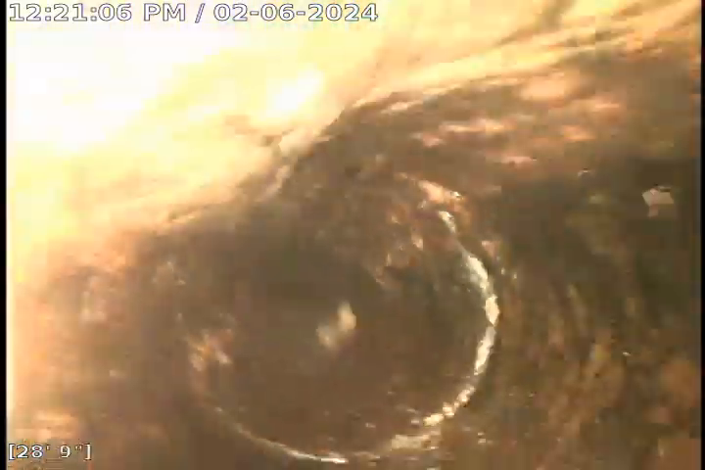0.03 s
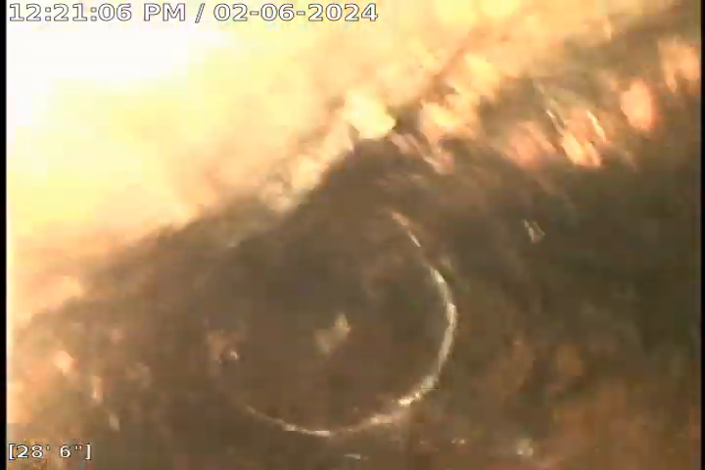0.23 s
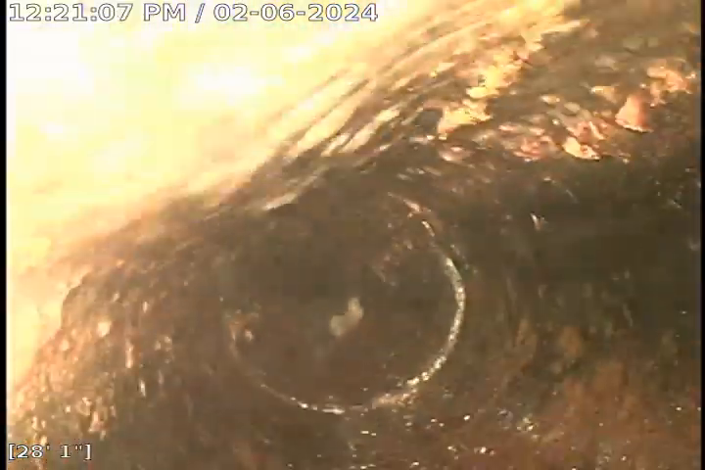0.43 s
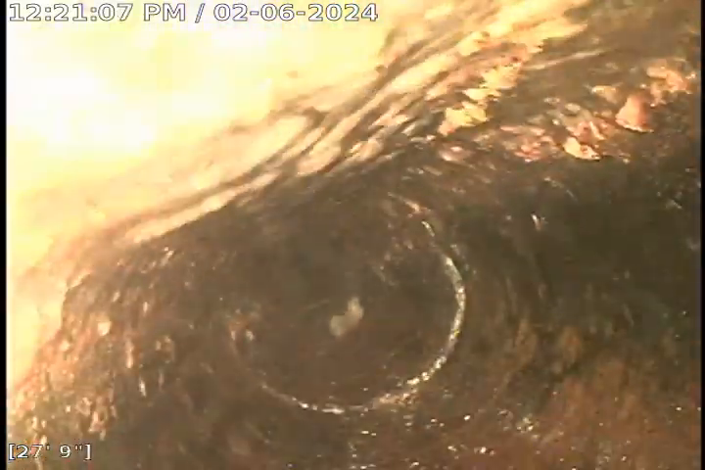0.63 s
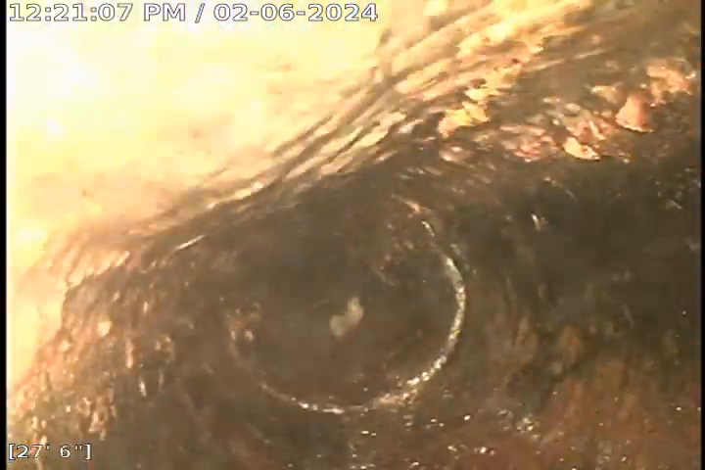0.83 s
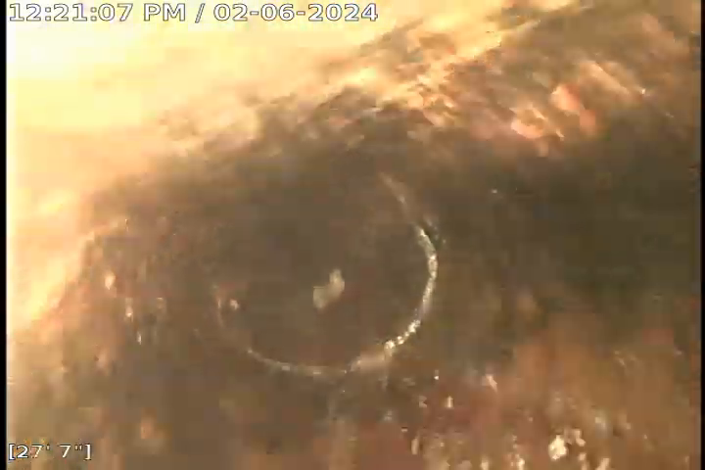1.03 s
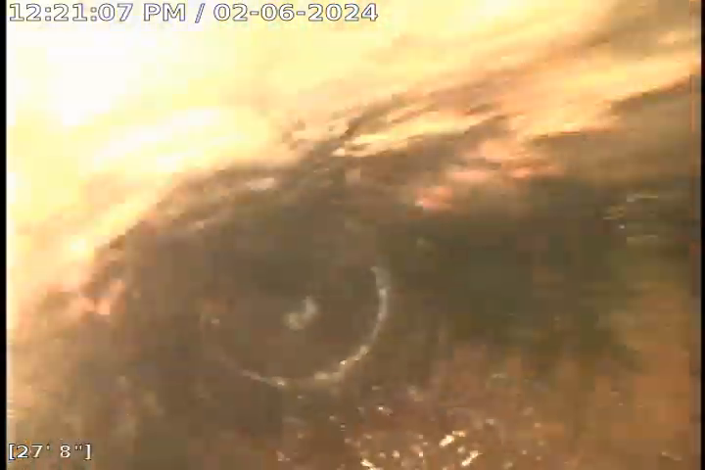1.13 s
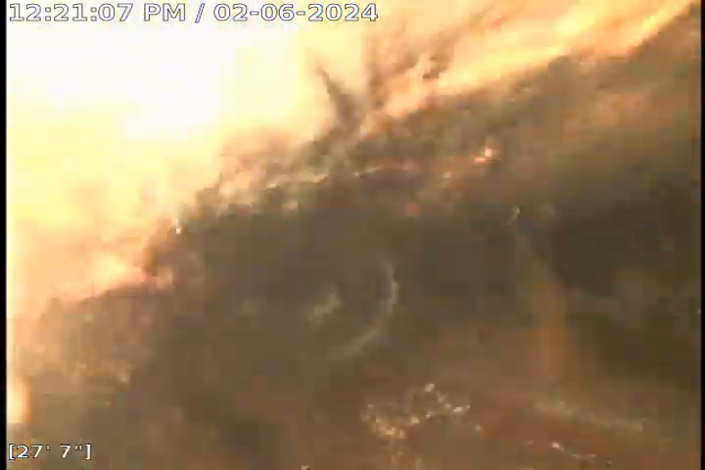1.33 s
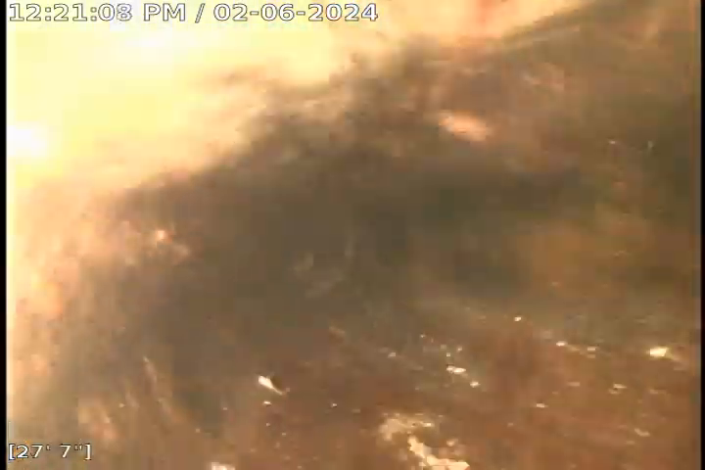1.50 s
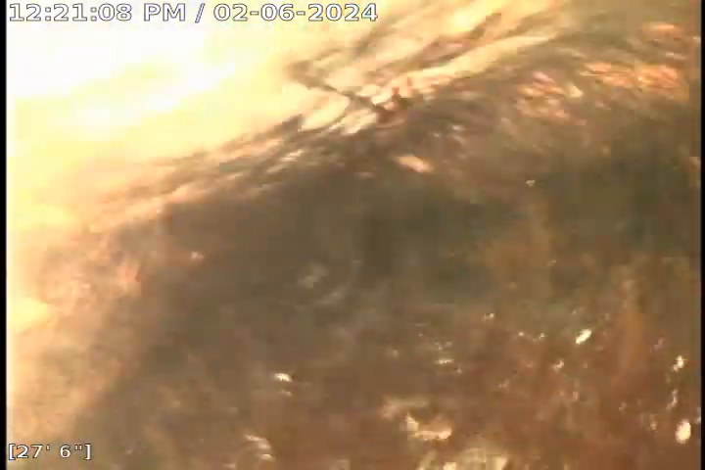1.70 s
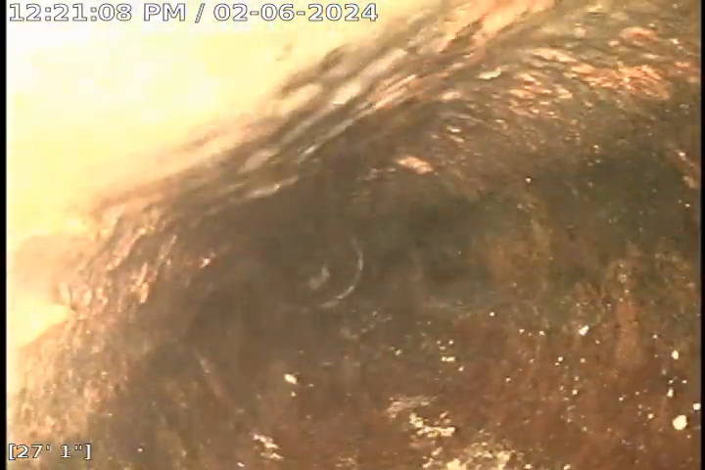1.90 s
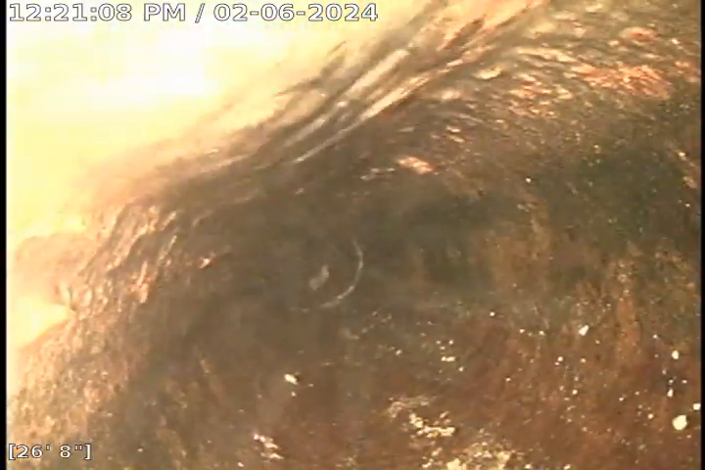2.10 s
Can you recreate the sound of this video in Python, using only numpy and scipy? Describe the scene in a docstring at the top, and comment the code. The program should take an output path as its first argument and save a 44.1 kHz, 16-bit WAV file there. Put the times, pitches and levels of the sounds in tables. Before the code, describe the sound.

A cable reel knocks loudly right at the start, a sharp crack with a short boom and rattle that overloads the microphone. Soft bumps follow until 0.8 seconds while the cable slides in faint, swelling strokes of hiss. Lighter clacks come at about 1.1 and 1.5 seconds, then more rubbing from 1.8 and a small dull knock at 2. The reel rumbles faintly throughout, in a small, hard room.

```python
"""A cable reel knocks as an inspection camera's cable is pulled from a drain and fed onto it.
One sharp knock overloads the microphone; lighter clacks and soft bumps follow. Each knock cracks
at the contact, rattles the struts and booms the frame near 250 Hz. Between knocks the cable slides
in short swelling strokes of hiss and keeps the frame rumbling faintly. The room is small and hard."""
import sys
import numpy as np
from scipy import signal
from scipy.fft import rfft, irfft, next_fast_len
from scipy.io import wavfile
from scipy.ndimage import map_coordinates

SR = 44100
rng = np.random.default_rng(int(sys.argv[2]) if len(sys.argv) > 2 else 0)


def generate_wav(sig):
    """Save sig (samples, or channels by samples) to the path in sys.argv[1] as 16-bit PCM at SR."""
    pcm = np.round(np.clip(np.atleast_2d(sig).T, -1, 1) * 32767).astype(np.int16)
    wavfile.write(sys.argv[1], SR, pcm)


N = 94859

# Cable knocks on the reel. Each row: start in seconds, boom gain in dB, boom tilt in dB per octave,
# clatter gain in dB, crack gain in dB, crack roll-off in Hz, room tail gain in dB.
KNOCKS = [(0.0145, 4, 1, -14, -5, 16400, -12.5), (1.057, -28, 29.5, -34.5, -40, 4940, -21),
          (1.124, -22, 15, -24.5, -26.5, 5200, -11), (1.4522, -23.5, -19, -24.5, -20, 14000, -15),
          (1.463, -30, 31.5, -37.5, -36, 9900, -6), (2.017, -27.5, 21, -35, -62, 6300, -15)]
# Soft bumps. Each row: start in seconds, boom gain in dB, boom tilt in dB per octave.
BUMPS = [(0.117, -25, 2), (0.298, -32.5, 6.5), (0.362, -30.5, 17), (.386, -29.5, 14), (0.521, -38.5, 19),
         (0.635, -31.5, 11.5), (0.725, -35, -11), (.771, -27, -11.5), (0.786, -24, 7), (1.068, -28.5, 18),
         (1.134, -24, -14), (1.221, -24.5, -7), (1.537, -26.5, 6), (2.041, -39, -27), (2.11, -37, -22)]
# Modes of frame, struts and contact. Each row: frequency in Hz, gain in dB, T60 in seconds.
FRAME_MODES = [(166.7, -10.5, 0.13), (249.1, -3, 0.12), (260.2, -1, 0.085), (273, -9.5, 0.15),
               (325, -16, 0.12), (347.3, -11.5, 0.09), (436.4, -23, 0.24)]
STRUT_MODES = [(440, 1, .08), (482, -1, .09), (655, 1, .11), (726, 3, .11), (775, -8, .15), (935, -2, .13),
               (1105, -3, .1), (1283, -7, .15), (1365, -8, .12)]
CONTACT_MODES = [(2930, 6, 0.025), (3110, 3, 0.025), (3430, 5, 0.032), (3610, -3, 0.035), (4160, -5, 0.03),
                 (4520, -6, 0.025)]
# Cable strokes. Each row: start and length in seconds, hiss and rasp gains in dB, top rasp pitch in Hz.
STROKES = [(0.222, 0.079, -55, -46.5, 4210), (0.298, 0.18, -46, -50.5, 3890),
           (0.432, 0.17, -46.5, -60, 3140), (0.64, .22, -49.5, -53.5, 4870), (0.78, 0.14, -48, -54, 4870),
           (0.972, 0.16, -55, -48, 2788), (1.084, 1, -57.5, -63, 3660), (1.428, 0.044, -58, -36, 3600),
           (1.797, 0.19, -44, -48, 3815), (1.946, 0.18, -45, -60, 3000)]
# Cable scuffs on the struts. Each row: start in seconds, length in seconds, gain in dB.
SCUFFS = [(1.035, 0.052, -40.5), (1.419, 0.027, -28), (1.475, 0.023, -37.5), (1.516, 0.032, -37.5),
          (1.967, 0.1, -47)]
# Reel rumble envelope. Each row: time in seconds, relative level in dB.
RUMBLE_ENVELOPE = [(0.0, -40), (0.19, -52), (0.48, -55), (0.69, -56), (0.93, -66.5), (1.08, -46),
                   (1.33, -56), (1.6, -49.5), (1.9, -53.5), (2.15, -54.5)]
# Noise spectra. Each row: frequency in Hz, relative density in dB.
CLATTER_SPECTRUM = [(100, -10), (170, -8), (350, 5), (470, 0), (570, -5.5), (720, 0), (1150, 1), (1480, -3),
                    (1800, -24), (9000, -42)]
CRACK_SPECTRUM = [(200, -4.5), (1400, -7), (2400, -4), (3150, -1.5), (4000, -4), (6500, -5), (9000, -12),
                  (15500, -20.5)]
HISS_SPECTRUM = [(300, -43), (1400, -11), (2500, 1), (5000, -1), (7000, -3.5), (10000, -8.5), (15500, -13)]
SCUFF_SPECTRUM = [(90, -37), (250, 16.5), (450, 6), (1100, 2.5), (1700, -4.5), (5000, -14), (15000, -37)]
RUMBLE_SPECTRUM = [(90, -10.5), (180, 0.5), (265, 2.5), (330, -13.5), (420, -1.5), (560, -31), (1000, -17),
                   (2000, -46.5)]
ROOM_NOISE_SPECTRUM = [(25, -18), (70, -3.5), (150, 1), (1000, -3), (1600, -7.5), (3500, -7.5), (6000, -11),
                       (9000, -19.5), (15500, -24)]
SELF_NOISE_SPECTRUM = [(25, 13), (280, -2.5), (6000, -19), (15500, -25)]
# Room decay. Each row: frequency in Hz, T60 in seconds.
ROOM_DECAY = [(150, 0.08), (500, 0.47), (1600, 0.39), (4000, 0.25), (8000, 0.24), (15000, 0.15)]
# Stereo width. Each row: frequency in Hz, side gain in dB.
STEREO_WIDTH = [(60, -7), (200, -40), (1000, -34), (3000, -27.5), (15000, -18)]
# Channel DC offsets. Each row: offset as a fraction of full scale.
DC_OFFSETS = [
    [.0188],
    [.0046],
]

BOOM_LAG_S, BOOM_RISE_S, TILT_PIVOT_HZ = 0.003685, 0.011, 260
CLATTER_RISE_S, CLATTER_T60_S, STRUT_DB, CLATTER_ROLLOFF_RATIO = 0.0011, 0.12, -5, 0.12
CRACK_RISE_S, CRACK_T60_S, RING_DB = 0.000077, 0.05, -6
SNAP_DB, SNAP_T60_S = -3.5, 0.004
SWELL_EXPONENT, RASP_SAG_RATIO, RASP_WIDTH_HZ = 0.81, 0.22, 1800
SCUFF_RAMP_S, GRAIN_DB = 0.026, 1.2
RUMBLE_GAIN_DB, RUMBLE_WOBBLE_DB = 7, 2.5
BOOM_ROOM_DB, CLATTER_ROOM_DB, ROOM_DELAY_S = -10, 4, 0.0033
ROOM_NOISE_DB, SELF_NOISE_DB = -48, -71
LOW_CUT_HZ, BAND_LIMIT_HZ = 127, 15800


def reel_knocks():
    """Knocks excite frame, struts and contact; soft bumps excite only the frame."""
    booms, impacts = np.zeros(N), np.zeros(N)
    for start_s, boom_db, tilt_db_oct, clatter_db, crack_db, rolloff_hz, room_db in KNOCKS:
        booms += amp(boom_db) * frame_boom(start_s + BOOM_LAG_S, tilt_db_oct)
        clatter = strut_clatter(start_s)
        crack = contact_crack(start_s)
        clatter += amp(room_db + CLATTER_ROOM_DB) * room_tail(noise(CLATTER_SPECTRUM), start_s)
        crack += amp(room_db) * room_tail(noise(CRACK_SPECTRUM), start_s)
        impacts += amp(clatter_db) * lowpass(clatter, CLATTER_ROLLOFF_RATIO * rolloff_hz)
        impacts += amp(crack_db) * lowpass(crack, rolloff_hz)
    for start_s, boom_db, tilt_db_oct in BUMPS:
        booms += amp(boom_db) * frame_boom(start_s, tilt_db_oct)
    return impacts + booms + amp(BOOM_ROOM_DB) * room_reverb(booms)


def frame_boom(start_s, tilt_db_oct):
    """Low frame modes, pushed in phase; each blow's tilt makes its boom deeper or higher."""
    t = since(start_s)
    boom = np.zeros(N)
    for hz, db, t60_s in FRAME_MODES:
        mode_db = db + tilt_db_oct * np.log2(hz / TILT_PIVOT_HZ) + rng.standard_normal()
        boom += amp(mode_db) * struck(t, BOOM_RISE_S, t60_s) * np.sin(2 * np.pi * hz * t)
    return boom


def strut_clatter(start_s):
    """Thin struts rattle and ring."""
    t = since(start_s)
    rattle = noise(CLATTER_SPECTRUM) * struck(t, CLATTER_RISE_S, CLATTER_T60_S)
    return rattle + amp(STRUT_DB) * ring(STRUT_MODES, t, CLATTER_RISE_S)


def contact_crack(start_s):
    """The contact point snaps, cracks and rings brightly."""
    t = since(start_s)
    snap = amp(SNAP_DB) * struck(t, CRACK_RISE_S, SNAP_T60_S)
    envelope = snap + struck(t, CRACK_RISE_S, CRACK_T60_S)
    return noise(CRACK_SPECTRUM) * envelope + amp(RING_DB) * ring(CONTACT_MODES, t, CRACK_RISE_S)


def cable_slide():
    """Stroke level and rasp pitch follow cable speed; duller scuffs rub the struts."""
    friction = np.zeros(N)
    for start_s, length_s, hiss_db, rasp_db, rasp_hz in STROKES:
        progress = np.clip(since(start_s) / length_s, 0, 1)
        speed = 1 - (2 * progress - 1) ** 2
        hiss = amp(hiss_db) * noise(HISS_SPECTRUM)
        rasp = amp(rasp_db) * cable_rasp(rasp_hz * (1 - RASP_SAG_RATIO * (1 - speed)))
        friction += speed ** SWELL_EXPONENT * (hiss + rasp)
    for start_s, length_s, db in SCUFFS:
        friction += amp(db) * held(start_s, length_s, SCUFF_RAMP_S) * noise(SCUFF_SPECTRUM)
    return friction * amp(GRAIN_DB * wobble(rate_hz=320))


def cable_rasp(centre_hz):
    """Narrow noise band with a moving centre."""
    white = rng.standard_normal((2, N))
    in_phase, quadrature = filtered(white, lambda hz: 1 / (1 + (2 * hz / RASP_WIDTH_HZ) ** 2))
    phase = 2 * np.pi * np.cumsum(centre_hz) / SR
    return unit_rms(in_phase * np.cos(phase) + quadrature * np.sin(phase))


def reel_rumble():
    """The turning reel rumbles unevenly."""
    level_db = np.interp(since(0), *np.transpose(RUMBLE_ENVELOPE)) + RUMBLE_GAIN_DB
    return amp(level_db + RUMBLE_WOBBLE_DB * wobble(rate_hz=25.85)) * noise(RUMBLE_SPECTRUM)


def room_reverb(x):
    """Wall reflections of x."""
    impulse = room_tail(rng.standard_normal(N), 0)
    return signal.fftconvolve(x, impulse / np.linalg.norm(impulse))[:N]


def room_tail(source_noise, start_s):
    """Noise shaped into a diffuse tail; the mids last longest."""
    hz, t, bins = signal.stft(source_noise, SR, nperseg=256)
    decay = np.exp(-np.log(1000) * np.maximum(t - start_s, 0) / log_interp(ROOM_DECAY, hz)[:, None])
    tail = signal.istft(bins * decay, SR, nperseg=256)[1]
    build_up = np.clip(since(start_s + ROOM_DELAY_S) / ROOM_DELAY_S, 0, 1)
    return tail[:N] * build_up


def ring(modes, t, rise_s):
    """Decaying modes, random phase per blow."""
    return sum(amp(db) * struck(t, rise_s, t60_s) * np.sin(2 * np.pi * (hz * t + rng.random()))
               for hz, db, t60_s in modes)


def struck(t, rise_s, t60_s):
    """Fast rise, exponential decay."""
    return (1 - np.exp(-t / rise_s)) * np.exp(-np.log(1000) * t / t60_s)


def held(start_s, length_s, ramp_s):
    """Linear attack, hold, exponential release."""
    return np.clip(since(start_s) / ramp_s, 0, 1) * np.exp(-since(start_s + length_s) / ramp_s)


def lowpass(x, rolloff_hz):
    """Two-pole treble roll-off."""
    return filtered(x, lambda hz: 1 / (1 + 1j * np.sqrt(2) * hz / rolloff_hz - (hz / rolloff_hz) ** 2))


def noise(spectrum):
    """Coloured noise, rms 1."""
    return unit_rms(filtered(rng.standard_normal(N), lambda hz: amp(log_interp(spectrum, hz))))


def wobble(rate_hz):
    """Smooth random curve."""
    knots = rng.standard_normal(int(N * rate_hz / SR) + 4)
    return map_coordinates(knots, [np.arange(N) * rate_hz / SR])


def filtered(x, response):
    """Apply a frequency response."""
    size = next_fast_len(N + SR // 2)
    return irfft(rfft(x, size) * response(np.fft.rfftfreq(size, 1 / SR)), size)[..., :N]


def log_interp(points, hz):
    """Interpolate over log frequency."""
    knots_hz, values = np.transpose(points)
    return np.interp(np.log(hz + 1), np.log(knots_hz + 1), values)


def since(start_s):
    """Seconds since start, zero before."""
    return np.maximum(np.arange(N) / SR - start_s, 0)


def amp(db):
    """dB to gain."""
    return 10 ** (np.asarray(db) / 20)


def unit_rms(x):
    """Scale to rms 1."""
    return x / np.sqrt(np.mean(x ** 2) + 1e-20)


def scene():
    """Reel and cable, bass cut by the microphone, over quiet room noise; nearly mono."""
    sources = reel_knocks() + cable_slide() + reel_rumble()
    mid = filtered(sources, lambda hz: hz ** 4 / (hz ** 4 + LOW_CUT_HZ ** 4))
    mid += amp(ROOM_NOISE_DB) * noise(ROOM_NOISE_SPECTRUM)
    scatter = rng.standard_normal(SR // 200)
    diffuse = signal.fftconvolve(mid, scatter / np.linalg.norm(scatter))[:N]
    side = filtered(diffuse, lambda hz: amp(log_interp(STEREO_WIDTH, hz)))
    side += amp(SELF_NOISE_DB) * noise(SELF_NOISE_SPECTRUM)
    return np.array([mid + side, mid - side])


def record(dry):
    """DC offset, full-scale clipping, band limit."""
    clipped = np.clip(dry + np.array(DC_OFFSETS), -1, 1)
    return filtered(clipped, lambda hz: hz < BAND_LIMIT_HZ)


dry = scene()
out = record(dry)
generate_wav(out)
```